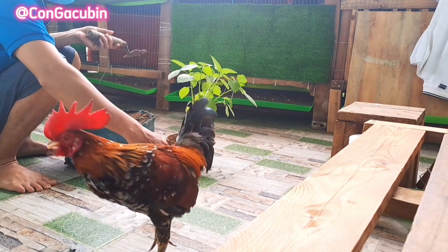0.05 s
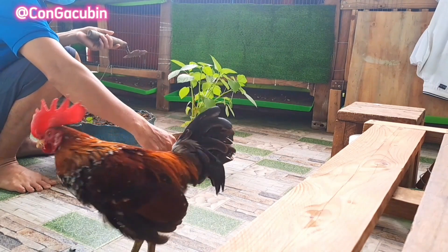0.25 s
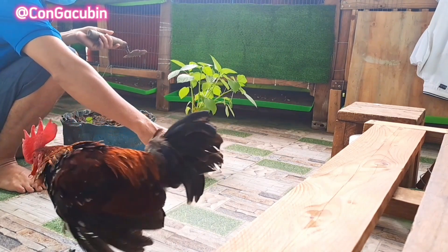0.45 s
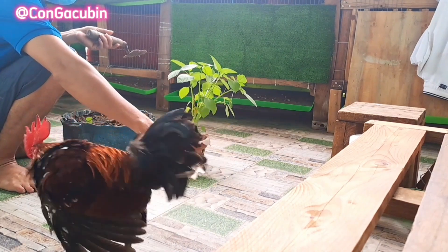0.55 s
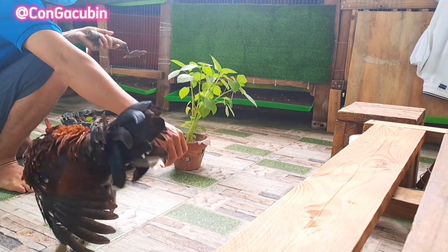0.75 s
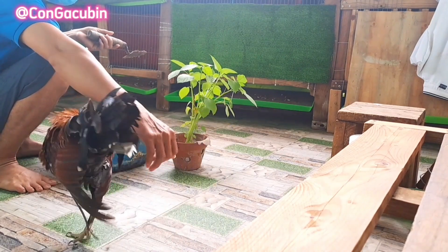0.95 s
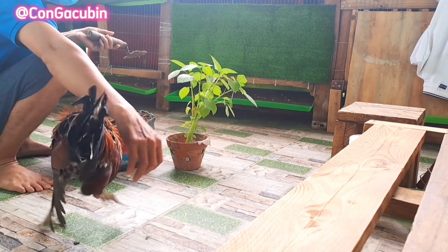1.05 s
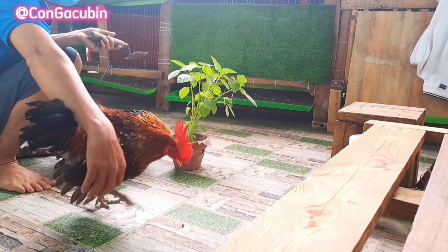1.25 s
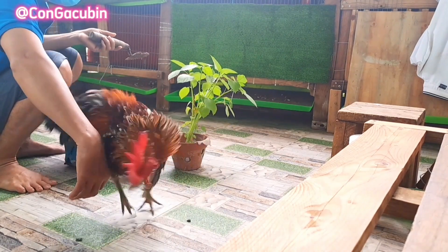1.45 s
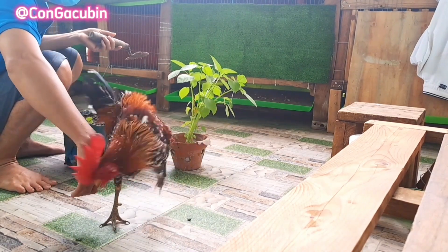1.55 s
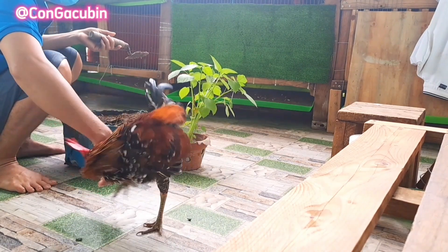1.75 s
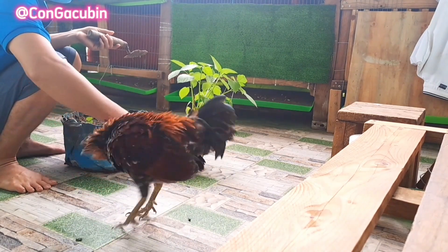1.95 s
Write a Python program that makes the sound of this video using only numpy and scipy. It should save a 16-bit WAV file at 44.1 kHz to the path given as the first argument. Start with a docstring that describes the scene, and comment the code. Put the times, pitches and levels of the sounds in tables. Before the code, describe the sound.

A rooster crows close to a stereo microphone in a small walled yard: three hoarse syllables, then a long clear note sinking to a short rasp, with faint wing rustles, soft footfalls and low rumble.

```python
"""Over a low rumble and faint outdoor air, wings rustle in a small walled yard and one drops with a dull swish.
A rooster close by crows three hoarse syllables, then a long clear note that sags and ends in a rasp.
Its syrinx slips between a harmonic tone and irregular rattling pulses, both coloured by the same throat.
Early reflections and a short diffuse tail return from the yard; feet knock softly from the note onward,
and a faint plain call sounds far off near the end."""
import sys
import numpy as np
from scipy import signal
from scipy.fft import rfft, irfft
from scipy.io import wavfile
from scipy.ndimage import uniform_filter1d, minimum_filter1d

SR = 44100
rng = np.random.default_rng(int(sys.argv[2]) if len(sys.argv) > 2 else 0)


def store_pcm(level_fs):
    """Save levels as 16-bit WAV."""
    pcm = np.round(np.clip(level_fs, -1, 1) * 32767).astype(np.int16)
    wavfile.write(sys.argv[1], SR, np.atleast_2d(pcm).T)


N = 88200  # samples, 2 s

# Spectrum of the faint outdoor air. Each row: frequency in Hz, relative gain in dB.
AIR_COLOUR = [(120, -22), (200, -9), (262, -1), (896, -1.5), (1240, -14), (1540, -4.5), (2500, -13.5),
              (15000, -27.5)]
AIR_DB = -47.5
# Spectrum of the low rumble. Each row: frequency in Hz, relative gain in dB.
RUMBLE_COLOUR = [(20, -9), (35, -62), (50, 14), (64, 1.5), (82, 9.5), (105, 1), (150, -1), (220, -13.5),
                 (400, -54)]
# Slow course of the rumble. Each row: time in seconds, level in dB.
RUMBLE_LEVEL = [(0, -37), (.1, -37), (.5, -42.5), (1.002, -45.5), (1.7, -46), (1.791, -41), (2, -42.5)]
RUMBLE_SIDE_DB = -23  # part opposite at the two microphones, relative to the part in common

# Surfaces near the bird. Each row: delay to the left microphone in seconds, to the right in seconds, level in dB.
ECHOES = [(.0031, .0044, -10.5), (.0093, .0078, -9)]
YARD_T60_S, YARD_TREBLE_T60_S = 0.26, 0.29  # decay by 60 dB, below and above 3 kHz
YARD_DB, YARD_GAP_S = -2, 0.0054  # tail level; silence before the tail
NOTE_YARD_DB = -2.5  # share of the long note sent to the tail

# Soft footfalls. Each row: start in seconds, level in dB.
STEPS = [(1.269, -41.5), (1.498, -40.5), (1.772, -46.5)]
# Spectrum of a footfall. Each row: frequency in Hz, relative gain in dB.
STEP_COLOUR = [(60, -22), (150, -3), (230, -13), (340, -3.5), (500, -2), (900, -32), (4000, -49)]
STEP_DECAY_S = 0.054

# Wing and foot rustles. Each row: start in seconds, length in seconds, level in dB.
RUSTLES = [(0.077, 0.052, -38.5), (0.184, 0.075, -44), (1.017, 0.054, -40), (1.154, 0.017, -38),
           (1.263, 0.16, -44), (1.486, 0.056, -41), (1.619, 0.0071, -38), (1.745, 0.084, -47),
           (1.897, 0.019, -45)]
# Spectrum of a rustle. Each row: frequency in Hz, relative gain in dB.
RUSTLE_COLOUR = [(200, 1.5), (500, 1.5), (1500, 4), (3000, 0.5), (6000, -1.5), (9000, -5.5), (12500, -1.5),
                 (15500, -6)]
RUSTLE_ATTACK_S, RUSTLE_DECAY_S = 0.004, 0.023
RUSTLE_GRAIN_DB = 1.2  # spread of the fast level fluctuation

SWISH_S, SWISH_WIDTH_S, SWISH_DB = 0.24, 0.098, -39.5  # the wing drops as the crow begins: centre, width, peak
# Spectrum of the swish. Each row: frequency in Hz, relative gain in dB.
SWISH_COLOUR = [(150, -1.5), (450, 1.5), (1500, -5.5), (4000, -40)]

# Faint plain tones: an undertone in the first syllable, a far call at the end.
# Each row: start in seconds, length in seconds, pitch in Hz, level in dB.
SIDE_TONES = [(0.348, 0.024, 855, -25.5), (0.411, 0.023, 845, -37), (1.824, 0.069, 1510, -52)]
SIDE_JITTER = 0.0088  # pitch spread as a fraction

# Syllables of the crow. Each row: time in seconds, pitch in Hz, roughness 0-1 before pitch jumps add to it,
# then levels in dB of the low, middle, high and top register, before the tone and rasp trims.
FIRST = [(0.229, 736.7, 0.47, -22.5, -18, -29, -47), (0.25, 814.6, 0.76, -9, -8.5, -28.5, -30.5),
         (0.266, 889, 0.72, -8, -6.5, -24.5, -26.5), (0.29, 1070, 0.82, -20, -14.5, -33, -41.5),
         (0.333, 1034, 0.57, -25.5, -22.5, -32, -31.5), (0.345, 1024, 0.082, -37.5, -4.5, -35.5, -51),
         (0.375, 1021, 0.3, -39, -25.5, -41, -50), (0.43, 1017, 0.23, -40, -35, -50.5, -68)]
SECOND = [(0.475, 1018, 0.83, -22.5, -21, -27, -43), (0.492, 1090, 0.52, -11.5, -15, -26, -34),
          (0.51, 1306, 0.47, -19.5, -12.5, -26, -38), (0.528, 1327, 0.22, -22.5, -10.5, -30, -36.5),
          (0.547, 1311, 0.26, -17.5, -12.5, -32, -34.5), (0.562, 1297, 0.85, -15, -24, -26, -36),
          (0.588, 1260, 0.69, -24.5, -29, -31.5, -49)]
THIRD = [(0.632, 802.4, 0.96, -19.5, -29, -32, -44), (0.656, 821, 0.88, -18.5, -15, -31, -32),
         (0.672, 1069, 0.75, -8, -21.5, -25.5, -32.5), (0.692, 1089, 0.07, -17, -6.5, -25.5, -37),
         (0.738, 1128, 0.078, -19.5, -20, -31, -30.5), (0.755, 1290, 0.45, -18.5, -17.5, -27.5, -34.5),
         (0.796, 1316, 0.25, -26, -19.5, -28, -35.5), (0.83, 1278, 0.11, -15, -18, -37, -36.5),
         (0.847, 1071, 0.2, -16.5, -19, -25, -33), (0.877, 1065, 0.048, -9, -20, -33.5, -33),
         (0.915, 1052, 0.13, -21.5, -25, -28.5, -31.5), (0.93, 828.7, 0.98, -22.5, -22.5, -27, -39),
         (0.971, 795, 0.84, -30.5, -28.5, -34, -40.5), (1.02, 802, 0.78, -30, -37, -50, -45)]
LEAD_IN = [(1.068, 790, 0.31, -29, -18, -38, -50), (1.083, 802.8, 0.08, -32, -25, -36.5, -39),
           (1.1, 809.7, 0.1, -27.5, -39, -30.5, -36), (1.11, 865, 0.92, -15, -24, -28, -29),
           (1.123, 944, 0.91, -23.5, -22, -45, -42), (1.13, 1020, 0.31, -26, -32, -31.5, -32.5),
           (1.152, 1032, 0.11, -34, -22, -32, -34.5)]
LAST_RASP = [(1.683, 911, 0.74, -19, -21, -40, -43), (1.72, 855, 0.72, -16, -27.5, -47.5, -57),
             (1.735, 786, 1, -51, -23, -56, -58)]
# Frequencies in Hz that divide the four registers.
REGISTER_EDGES_HZ = [1670, 2945, 6000]
# Exponent on roughness in each register, low to top: a small one lets the rasp take over sooner.
RASP_POWER = [2.43, 1.13, 0.51, 0.51]
# Syrinx spectrum before the throat. Each entry: relative level in dB, from the fundamental up.
HARMONICS_DB = [12.5, 0, -0.5, 8.5, -4.5, -8.5, 5, 1.5, -1, 3, -23, -3.5, -17, -9, -5]
# Resonances of the throat. Each row: frequency in Hz, relative gain in dB.
THROAT = [(620, -57), (770, -9), (860, 1.5), (1100, -0.5), (1320, -17), (1450, -7), (1620, -4.5),
          (2080, 10), (2400, 0.5), (2680, 5.5), (2950, -10), (3500, -20.5), (4250, -11), (4600, -19),
          (5350, -38.5), (5950, -21), (6500, -31.5), (7350, -11.5), (8200, -36), (8700, -42.5), (9500, -24),
          (10200, -37.5), (11100, -17.5), (12100, -29), (15500, -33)]
# Beak colour of the opening syllable, ringing higher at the top. Each row: frequency in Hz, gain in dB.
FIRST_BEAK = [(5000, 11), (6000, -6.5), (7300, -8.5), (8250, 27), (9600, 2.5)]
# Colour of the beak opened for the lead-in to the long note. Each row: frequency in Hz, gain in dB.
LEAD_IN_BEAK = [(1200, 8.5), (1600, 8.5), (3100, -8), (4000, 10.5)]
BEAK_CUT_HZ = 736  # the small beak radiates little below this
ATTACK_S, RELEASE_S = 0.0039, 0.0062
TONE_DB, RASP_DB = -2, -5.5
CLEAR_JITTER, JITTER, JITTER_HZ = 0.00081, 0.0265, 508  # pitch spread when clear, added when rough; its speed
RATTLE_PER_CYCLE, RATTLE_SCATTER = .22, .25  # slaps per pitch cycle; log spread of their intervals
RATTLE_SIZE_DB, RATTLE_DECAY_S = 4, 0.0025  # spread of slap sizes; fading of each puff
GAS_DB = 3  # air noise in the puffs, beside the clicks
FLUTTER, CHOP_S = 0.58, 0.00056  # depth to which the puffs modulate the tone; smoothing of that modulation
BREAK_HZ_PER_S, BREAK_S = 22000, 0.0058  # pitch slope that makes the voice fully rough; averaging time

# The long clear note. Each row: time in seconds, pitch in Hz, levels in dB of harmonics 1, 2, 3, 4
# and of all overtones above them together.
NOTE = [(1.162, 1025, -44, -34, -39, -30.5, -30.5), (1.192, 1027, -24.5, -24, -37, -23.5, -32.0),
        (1.224, 1022, -24, -13, -33, -27, -31.5), (1.291, 1012, -24, -14, -33, -22, -38.5),
        (1.321, 1010, -24.5, -18, -36, -19.5, -35.5), (1.371, 1003, -26.5, -14.5, -38, -22, -38.0),
        (1.425, 1003, -21, -11, -34, -33, -37), (1.46, 990, -38, -22, -33, -28.5, -43),
        (1.496, 982, -27, -12.5, -43.5, -32, -43.5), (1.556, 974, -13, -23, -31, -43.5, -46.5),
        (1.622, 956, -11, -19, -33, -45, -56), (1.677, 929, -16.5, -30.5, -29, -51, -59)]
# The turning head beams harmonics sideways. Each row: time in seconds, left minus right in dB of harmonics 1, 2, 4.
NOTE_PAN = [(1.22, 1, 3.5, 3), (1.29, -24, 11, 3), (1.38, 1, 11.5, -13), (1.43, -3, 12, 4),
            (1.55, 3, 5.5, 1), (1.64, -10, 5, -10)]
NOTE_OTHER_PAN_DB = -7.5  # left minus right of every other harmonic
CROW_LAG_S, NOTE_LAG_S = 0.000214, 0.00017  # later arrival at the left microphone: syllables, long note

TOP_HZ = 15900
CEILING, LIMITER_S = .93, .004  # peak amplitude; window of the limiter


def undb(db):
    """Logarithmic level: decibels become an amplitude ratio."""
    return 10 ** (np.asarray(db) / 20)


def unit(x):
    """Normalisation: the signal is scaled to rms 1."""
    return x / np.sqrt(np.mean(x ** 2) + 1e-18)


def times():
    """Sampling: the time of every sample in seconds."""
    return np.arange(N) / SR


def gain_at(hz, points):
    """Frequency response: gain interpolated in dB along log frequency."""
    f, db = np.array(points, float).T
    return undb(np.interp(np.log(np.maximum(hz, 1)), np.log(f), db))


def colour(x, points):
    """Linear filtering: the spectrum is multiplied by a frequency response, then set to rms 1."""
    response = gain_at(np.fft.rfftfreq(N, 1 / SR), points)
    return unit(irfft(rfft(x) * response, N))


def walk(rate_hz):
    """Random modulation: twice-averaged noise gives a smooth wobble of rms 1."""
    k = max(int(SR / rate_hz), 1)
    once = uniform_filter1d(rng.standard_normal(N), k)
    return unit(uniform_filter1d(once, k))


def gate(start_s, end_s):
    """Amplitude envelope: quick rise before the start, full level to the end, exponential release."""
    t = times()
    rise = (np.maximum(start_s - t, 0) / ATTACK_S) ** 2
    fall = np.maximum(t - end_s, 0) / RELEASE_S
    return np.exp(-rise - fall)


def delay(x, left_s, right_s):
    """Propagation delay: a linear phase shift sets the arrival time at each microphone."""
    lags = np.array([[left_s], [right_s]])
    return irfft(rfft(x) * np.exp(-2j * np.pi * np.fft.rfftfreq(N, 1 / SR) * lags), N)


def background():
    """Coherence: a rumble almost alike at both microphones lies under independent air noise."""
    mid, side = colour(rng.standard_normal((2, N)), RUMBLE_COLOUR)
    level = undb(np.interp(times(), *np.array(RUMBLE_LEVEL).T))
    rumble = level * (mid + undb(RUMBLE_SIDE_DB) * side * np.array([[1], [-1]]))
    air = colour(rng.standard_normal((2, N)), AIR_COLOUR)
    return rumble + undb(AIR_DB) * air


def yard(x):
    """Reverberation: dense reflections decay exponentially, independent at the two microphones."""
    t = times()
    noise = rng.standard_normal((2, N))
    low = signal.sosfilt(signal.butter(2, 3000, fs=SR, output="sos"), noise)
    treble = noise - low
    tail = low * undb(-60 * t / YARD_T60_S) + treble * undb(-60 * t / YARD_TREBLE_T60_S)
    response = unit(tail * (t > YARD_GAP_S)) / np.sqrt(N)
    return signal.fftconvolve(x[None], response, axes=1)[:, :N] * undb(YARD_DB)


def steps():
    """Damped impact: each foot excites a dull noise burst that decays exponentially."""
    t = times()
    env = sum(undb(db) * (t > s) * np.exp(-np.abs(t - s) / STEP_DECAY_S) for s, db in STEPS)
    return env * colour(rng.standard_normal(N), STEP_COLOUR)


def rustles():
    """Friction noise: feathers and claws brush the floor in short grainy strokes."""
    t = times()
    env = np.zeros(N)
    for start, length, db in RUSTLES:
        attack = np.clip((t - start) / RUSTLE_ATTACK_S, 0, 1)
        decay = np.exp(-np.maximum(t - start - length, 0) / RUSTLE_DECAY_S)
        env += undb(db) * attack * decay
    grain = undb(RUSTLE_GRAIN_DB * walk(430))
    return env * colour(rng.standard_normal((2, N)) * grain, RUSTLE_COLOUR)


def swish():
    """Flow noise: air pushed aside by the lowered wing swells and fades as a Gaussian."""
    env = np.exp(-((times() - SWISH_S) / SWISH_WIDTH_S) ** 2)
    return undb(SWISH_DB) * env * colour(rng.standard_normal((2, N)), SWISH_COLOUR)


def side_tones():
    """Frequency modulation: short sinusoids waver slightly in pitch beside the crow."""
    wobble = 1 + SIDE_JITTER * walk(JITTER_HZ)
    out = np.zeros(N)
    for start, length, hz, db in SIDE_TONES:
        tone = unit(np.sin(2 * np.pi * np.cumsum(hz * wobble) / SR))
        out += undb(db) * gate(start, start + length) * tone
    return out


def rattle(hz):
    """Irregular pulse excitation: slaps every few cycles give clicks and short fading puff envelopes."""
    chance = rng.standard_normal((2000, 2))
    progress = np.cumsum(hz * RATTLE_PER_CYCLE / SR)
    at = np.searchsorted(progress, np.cumsum(np.exp(RATTLE_SCATTER * chance[:, 0])))
    inside = at < N
    clicks = np.zeros(N)
    clicks[at[inside]] = undb(RATTLE_SIZE_DB * chance[inside, 1])
    puffs = signal.lfilter([1], [1, -np.exp(-1 / (RATTLE_DECAY_S * SR))], clicks)
    return clicks, unit(puffs)


def syllable(table, beak=None):
    """Source and filter: tone and rattle share one throat, and roughness shifts energy between them."""
    t, rows = times(), np.array(table, float)
    hz, rough, *levels = (np.interp(t, rows[:, 0], col) for col in rows[:, 1:].T)
    # a fast pitch change breaks the tone up
    slope = uniform_filter1d(np.gradient(hz), int(BREAK_S * SR)) * SR
    rough = np.clip(np.hypot(rough, slope / BREAK_HZ_PER_S), 0, 1)
    env = gate(rows[0, 0], rows[-1, 0])
    on = env > 1e-4  # only the audible samples are computed

    def throat(v):
        return gain_at(v, THROAT) * (gain_at(v, beak) if beak else 1)

    clicks, puffs = rattle(hz)
    jitter = (CLEAR_JITTER + JITTER * rough) * walk(JITTER_HZ)
    phase = 2 * np.pi * np.cumsum(hz * (1 + jitter)) / SR
    flutter = uniform_filter1d(puffs - puffs.mean(), int(CHOP_S * SR))
    chop = (1 + FLUTTER * rough * flutter)[on]

    k = np.arange(1, len(HARMONICS_DB) + 1)[:, None]
    partial_hz = k * hz[on]
    weights = throat(partial_hz) * undb(HARMONICS_DB)[:, None] * (partial_hz < TOP_HZ)
    partials = weights * np.sin(k * phase[on] + rng.uniform(0, 2 * np.pi, k.shape))

    f = np.fft.rfftfreq(N, 1 / SR)
    gas = undb(GAS_DB) * puffs * rng.standard_normal(N)
    rasp = rfft(unit(clicks) + gas) * throat(f)

    edges, out = [1, *REGISTER_EDGES_HZ, SR], np.zeros((2, N))
    for lo, hi, db, power in zip(edges, edges[1:], levels, RASP_POWER):
        def band(v):
            return 1 / np.sqrt((1 + (lo / (v + 1)) ** 40) * (1 + (v / hi) ** 40))

        share = band(partial_hz)
        hoarse = rough[on] ** power
        strength = np.sqrt(((share * weights) ** 2).sum(0) / 2 + 1e-12)  # rms of the partials in the register
        tone = (share * partials).sum(0) / strength
        # where the partials are weak the rasp gains share
        clear = np.sqrt(1.001 - hoarse ** 2) * (strength / strength.max()) ** .7
        noise = unit(irfft(rasp * band(f), N))[on]
        voice = undb(TONE_DB) * clear * chop * tone + undb(RASP_DB) * hoarse * noise
        out[:, on] += undb(db[on]) * voice / np.hypot(clear, hoarse)
    return signal.sosfilt(signal.butter(6, BEAK_CUT_HZ, "high", fs=SR, output="sos"), out * env)


def long_note():
    """Harmonic series: the locked syrinx sags in pitch as upper partials fade and the fundamental swells."""
    t, rows, pans = times(), np.array(NOTE, float), np.array(NOTE_PAN, float)
    hz, *levels = (np.interp(t, rows[:, 0], col) for col in rows[:, 1:].T)
    pan_of = dict(zip((1, 2, 4), (np.interp(t, pans[:, 0], col) for col in pans[:, 1:].T)))
    phase = 2 * np.pi * np.cumsum(hz * (1 + CLEAR_JITTER * walk(JITTER_HZ))) / SR
    # the throat divides the last level among the overtones above the fourth
    partials = np.array([gain_at(k * hz, THROAT) * undb(db) for k, db in enumerate(HARMONICS_DB, 1)])
    overtones = partials[len(levels) - 1:]
    overtones = undb(levels[-1]) * overtones / np.linalg.norm(overtones, axis=0)
    sizes = [*undb(levels[:-1]), *overtones]
    out = np.zeros((2, N))
    for k, size in enumerate(sizes, 1):
        sides = undb(np.array([[.5], [-.5]]) * pan_of.get(k, NOTE_OTHER_PAN_DB))
        sides = sides / np.linalg.norm(sides, axis=0)  # panning keeps the power
        out += 2 * size * sides * np.sin(k * phase + rng.uniform(0, 2 * np.pi))
    return out * gate(rows[0, 0], rows[-1, 0])


def scene():
    """Superposition: direct crow, reflections, the bird's movements and the background add linearly."""
    crow = syllable(FIRST, FIRST_BEAK) + syllable(SECOND) + syllable(THIRD)
    crow += syllable(LEAD_IN, LEAD_IN_BEAK) + syllable(LAST_RASP)
    note = long_note()
    direct = delay(crow, CROW_LAG_S, 0) + delay(note, NOTE_LAG_S, 0) + side_tones()
    echoes = sum(undb(db) * delay(crow, left, right) for left, right, db in ECHOES)
    tail = yard((crow + undb(NOTE_YARD_DB) * note).mean(0))
    return direct + echoes + tail + rustles() + swish() + steps() + background()


def record(dry):
    """Peak limiting and band limiting: smoothed gain lowers the loudest peaks, a low-pass cuts the top."""
    size = int(LIMITER_S * SR)
    needed = CEILING / np.maximum(np.abs(dry).max(0), CEILING)
    gain = uniform_filter1d(minimum_filter1d(needed, size), size)
    return signal.sosfilt(signal.ellip(12, .2, 80, TOP_HZ, fs=SR, output="sos"), dry * gain)


dry = scene()
out = record(dry)
store_pcm(out)
```